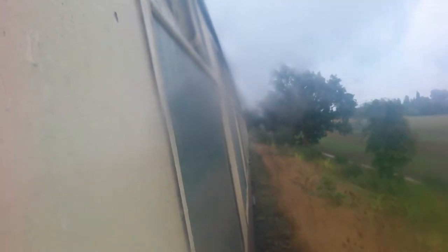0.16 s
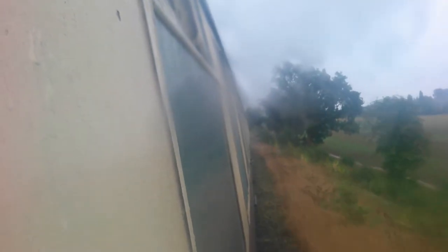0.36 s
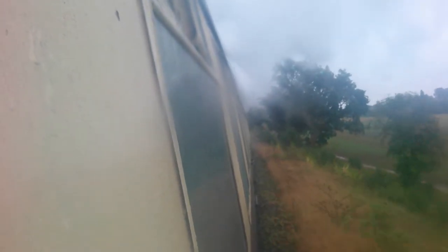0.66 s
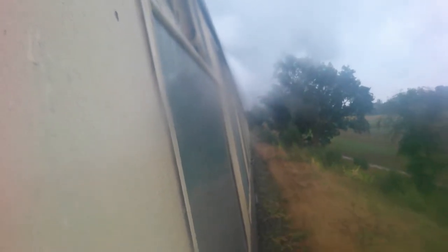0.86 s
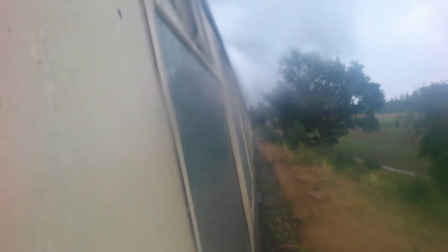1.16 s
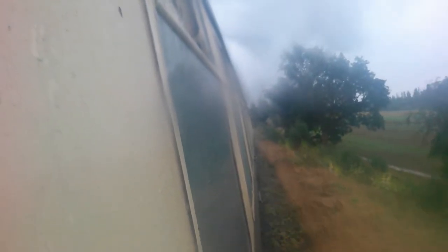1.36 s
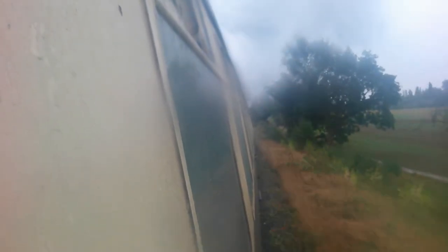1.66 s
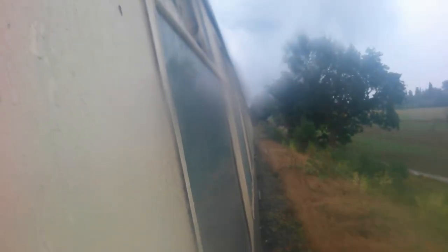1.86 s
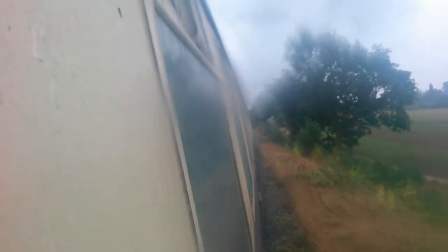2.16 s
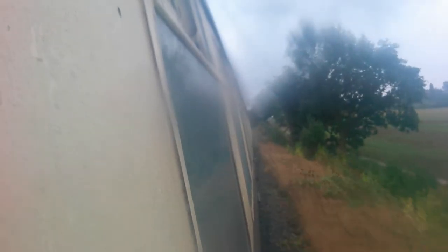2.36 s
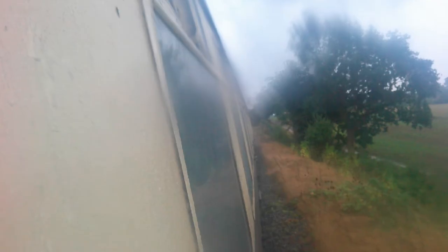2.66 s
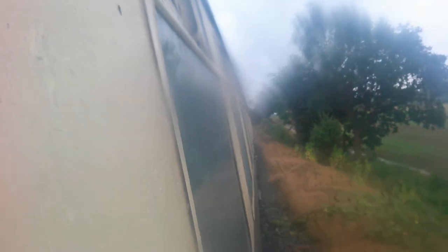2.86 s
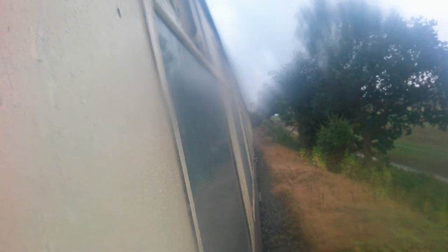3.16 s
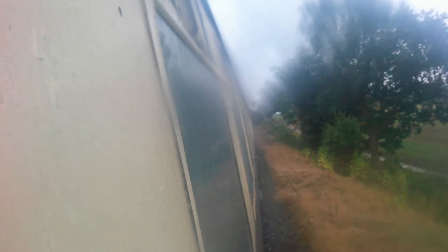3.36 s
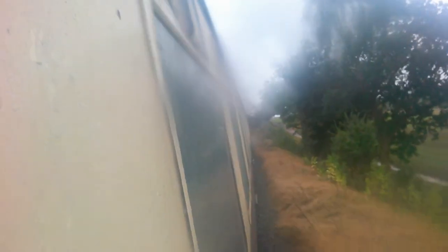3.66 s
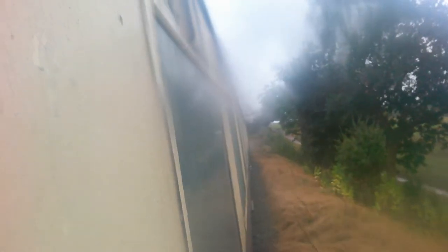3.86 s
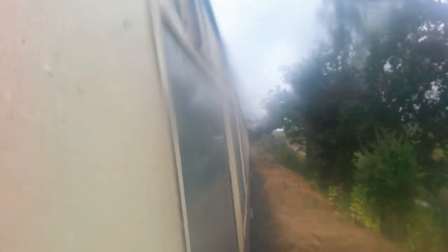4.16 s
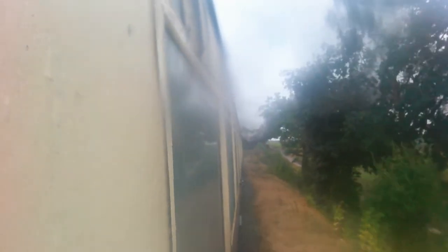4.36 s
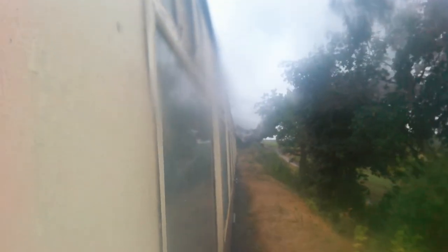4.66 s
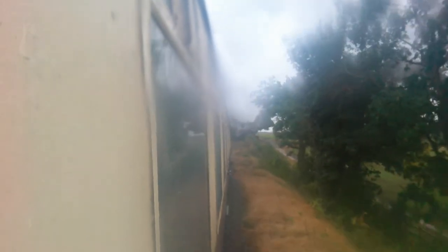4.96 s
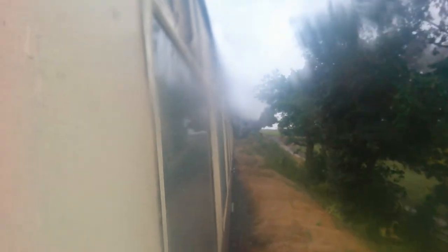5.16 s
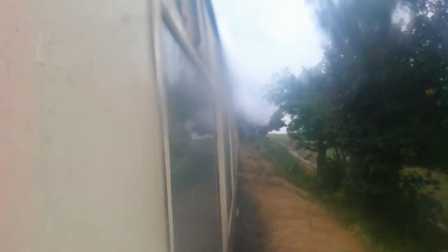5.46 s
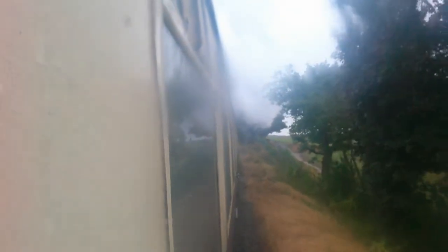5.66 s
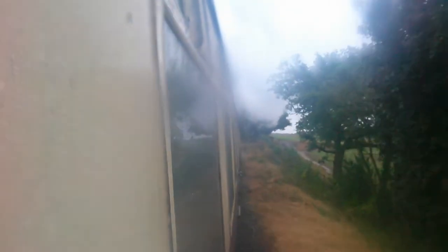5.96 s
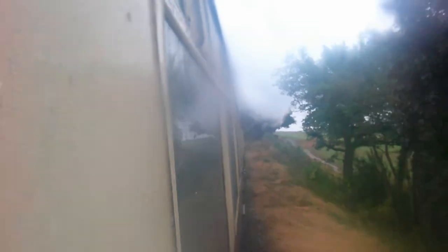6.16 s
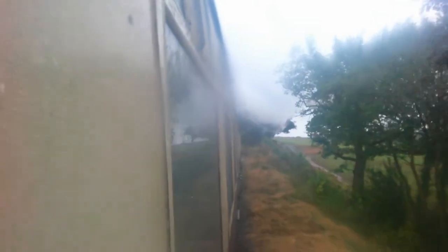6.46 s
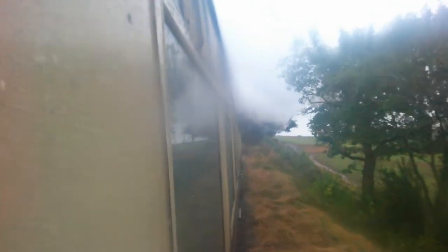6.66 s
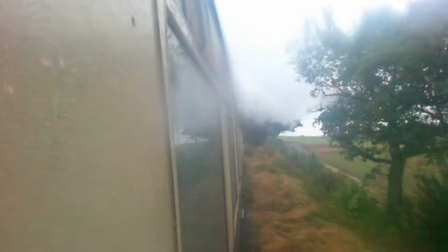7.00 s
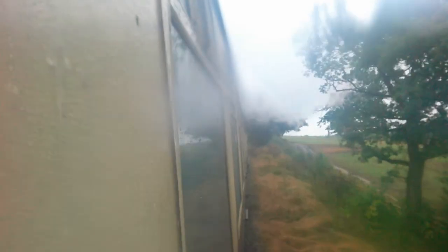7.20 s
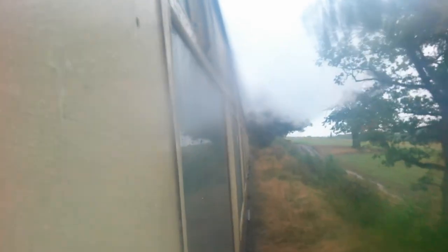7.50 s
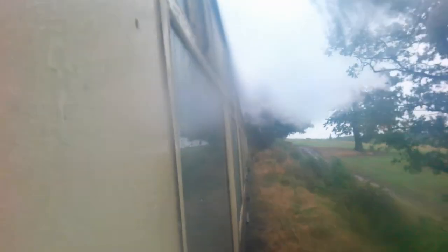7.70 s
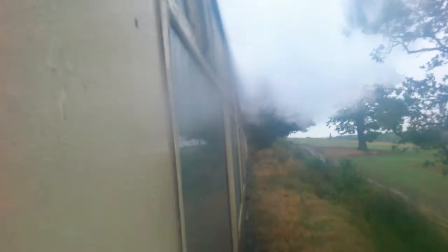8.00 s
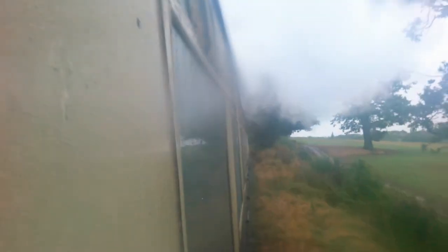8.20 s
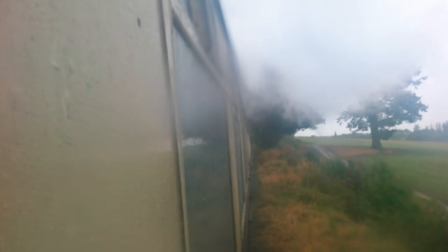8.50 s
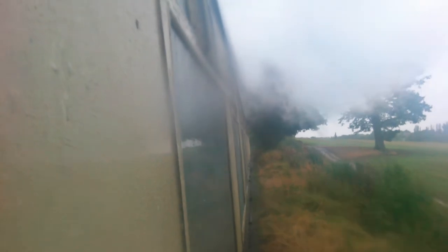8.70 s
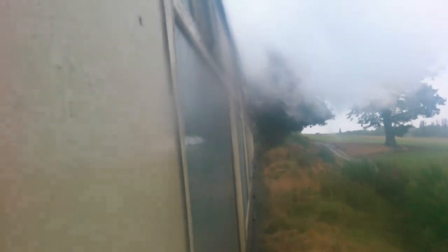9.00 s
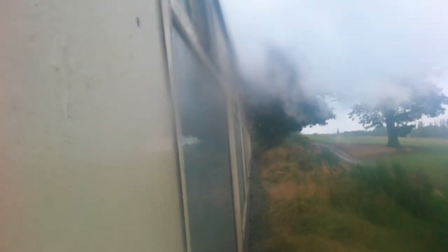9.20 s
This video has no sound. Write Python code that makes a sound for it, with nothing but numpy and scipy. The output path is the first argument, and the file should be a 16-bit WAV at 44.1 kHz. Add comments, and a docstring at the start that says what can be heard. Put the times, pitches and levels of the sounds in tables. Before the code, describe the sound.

Close, mono sound from an open window of a running steam train, the small microphone overloading almost constantly. Deep wind buffeting, low wheel roar and a faint steady hiss run throughout, with gritty crackle from clipped peaks supplying most of the treble. At 0.1 s a quick group of four dull axle thumps crosses a rail joint; more groups follow near 1.8, 3.5, 5.2, 6.9 and 8.6 s, strong early and softer later. Muffled exhaust puffs, weak at first, beat about nine times a second, unevenly, with occasional brief swells. A breathy low howl of wind off an edge rises by 0.4 s, sinks slightly in pitch and peaks around 1.7 s, nearly vanishes near 3 s, and returns after 5.7 s. Gusts are strong around 7 and 8 s. From 8.9 s howl and roar surge to their loudest, ending abruptly at 9.3 s without slowing.

```python
"""A running steam train, heard from an open carriage window by a small microphone that overloads.
Wind buffeting, wheel roar and a faint steady hiss run throughout, all as coloured noise; four axles thump
a rail joint at once, then about every 1.7 s. Exhaust puffs, weak at first, beat about nine times a second.
A band of noise howls off an edge, thins out near 3 s and is strongest at the end, where the roar swells too.
The flattened peaks of the overload make nearly all of the treble."""
import sys
import numpy as np
from scipy import signal
from scipy.fft import rfft, irfft
from scipy.io import wavfile
from scipy.ndimage import uniform_filter1d

SR = 44100
rng = np.random.default_rng(int(sys.argv[2]) if len(sys.argv) > 2 else 0)


def output_pcm(signal):
    """Save a mono or channel-first signal as 16-bit PCM at the path in sys.argv[1].

    Samples are clipped to [-1, 1] before scaling.
    """
    pcm = np.clip(np.atleast_2d(signal).T, -1, 1) * 32767
    wavfile.write(sys.argv[1], SR, np.round(pcm).astype(np.int16))


N = 411894   # samples, 9.34 s


def from_db(db):
    """Decibels to gain."""
    return 10 ** (np.asarray(db) / 20)


def rms_one(x):
    """Scaled to rms 1."""
    return x / np.sqrt(np.mean(x ** 2) + 1e-20)


def coloured(x, spectrum):
    """Filtered by a (Hz, dB) curve: level below its first point, silent above its last."""
    hz = np.arange(1, N // 2 + 2) * SR / N
    point_hz, point_db = np.transpose(spectrum)
    gain_db = np.interp(np.log(hz), np.log(point_hz), point_db, right=-150)
    return irfft(rfft(x) * from_db(gain_db), N)


def noise(spectrum):
    """Steady noise of a given colour, rms 1."""
    return rms_one(coloured(rng.standard_normal(N), spectrum))


def drift(rate_hz):
    """Slow chance: noise through a double one-pole low-pass, rms 1."""
    r = np.exp(-2 * np.pi * rate_hz / SR)
    slow = signal.lfilter([1], [1, -2 * r, r * r], rng.standard_normal(N + SR))
    return rms_one(slow[SR:])   # the first second lets the filter settle


def curve(rows):
    """Columns of a table, joined by straight lines in time."""
    s, *columns = np.transpose(rows)
    return [np.interp(np.arange(N) / SR, s, c) for c in columns]


def bursts(events, rise_share):
    """An envelope with one hump per event: a share of its length rises to the peak, the rest dies away."""
    t, out = np.arange(N) / SR, np.zeros(N)
    for s, level_db, length_s in events:
        near = slice(max(round((s - .1) * SR), 0), round((s + .2) * SR))
        late = (t[near] - s) / max(length_s, .005)
        side = np.where(late < 0, rise_share, 1 - rise_share)
        out[near] += from_db(level_db) * np.exp(-(late / side) ** 2)
    return out


def evened(x, share, window_s):
    """Noise that holds its level: part of its random swell is divided out."""
    swell = uniform_filter1d(x ** 2, size=max(round(window_s * SR), 1)) + 1e-6
    return rms_one(x * swell ** (-share / 2))


# Colour of the hiss. Each row: frequency in Hz, level in dB per Hz.
HISS_COLOUR = [(600, -9.5), (1000, -3), (2000, -7.5), (3000, -20), (4200, -33)]


def faint_hiss():
    """A quiet bed of higher noise at a constant level."""
    level_db = -44
    return from_db(level_db) * noise(HISS_COLOUR)


# Colour of the buffeting. Each row: frequency in Hz, level in dB per Hz.
BUFFET_COLOUR = [(8, 2.5), (20, 5), (50, 5.5), (100, -2.5), (160, -4), (250, -9.5), (400, -56), (700, -66)]
# Gusts on the microphone. Each row: time in seconds, level in dB.
GUSTS = [(0, -8), (.6, -8.5), (1.0, -6), (1.35, -12.5), (1.9, -7.5), (2.7, -13), (3.3, -7), (4.1, -5),
         (5.0, -15), (5.4, -6.5), (6.1, -10), (6.85, -3), (7.5, -7), (8.1, -3.5), (8.8, -5), (9.34, -7.5)]


def wind_buffeting():
    """Turbulent air pushes on the microphone: deep noise that follows the gusts and flutters at random."""
    gust_db, = curve(GUSTS)
    flutter_db = 1.27 * drift(9.4) + 1.5 * drift(3.0)
    return from_db(gust_db + flutter_db) * noise(BUFFET_COLOUR)


HOWL_WIDTH_HZ, HOWL_WANDER_HZ = 66.3, 9   # full width of the band; rms wander of its centre


def howl_band(centre_hz):
    """Air shed from an edge: slow noise turned up to a moving centre makes a steep-sided band."""
    sos = signal.butter(2, HOWL_WIDTH_HZ / 2, fs=SR, output="sos")
    slow = signal.sosfilt(sos, rng.standard_normal((2, N + SR)))[:, SR:]
    phase = 2 * np.pi * np.cumsum(centre_hz + HOWL_WANDER_HZ * drift(3.0)) / SR
    return rms_one(slow[0] * np.cos(phase) + slow[1] * np.sin(phase))


# Course of the edge howl. Each row: time in seconds, level in dB, centre in Hz.
HOWL_COURSE = [(0, -13.5, 286.7), (.25, -21, 287), (.33, -3.5, 288), (.8, -5, 282), (1.05, -2.5, 265),
               (1.65, 0, 250), (2.2, -6.5, 252), (2.6, -15.5, 258), (3.05, -22.5, 268.9), (3.8, -12, 271),
               (4.5, -10, 274), (5.3, -12.5, 268), (5.75, -4.5, 258), (6.4, -4.5, 250), (6.6, -7.5, 258),
               (7.15, -7, 268), (7.3, -0.5, 276.1), (8.15, 2, 290), (8.55, -4, 275), (8.9, 5.5, 288),
               (9.34, 5.5, 286)]


def edge_howl():
    """Wind sheds from an edge as a band of noise that glides in pitch, its level partly evened."""
    level_db, centre_hz = curve(HOWL_COURSE)
    band = evened(howl_band(centre_hz), share=0.21, window_s=0.046)
    return from_db(level_db + 1.5 * drift(4.0)) * band


# Colour of the rolling wheels. Each row: frequency in Hz, level in dB per Hz.
ROAR_COLOUR = [(100, -17.5), (200, -4), (300, -2.5), (420, 0), (520, -4), (600, -9), (700, -25), (900, -40),
               (1300, -60)]
# Strength of the rolling. Each row: time in seconds, level in dB.
ROLLING = [(0, -10), (.3, -11.5), (.65, -5), (1.1, -8), (1.9, -6), (2.4, -7), (2.65, -13), (3.1, -9),
           (3.5, -10), (4.2, -6), (5.0, -8.5), (6.1, -5.5), (6.8, -7.5), (7.25, -2.5), (8.7, -1), (9.1, 5),
           (9.34, 4)]


def wheel_roar():
    """Wheels rolling on rail: a band of low noise that rises and falls with a small random flutter."""
    level_db, = curve(ROLLING)
    return from_db(level_db + 0.73 * drift(6.0)) * noise(ROAR_COLOUR)


RAIL_M = 18.3   # from one rail joint to the next
# Rail joints. Each row: first axle in seconds, then the thump of each of the four axles in dB.
JOINTS = [(.082, 7.5, 5, -7, -3.5), (1.826, 9, 7.5, 5.5, 1.5), (3.546, 8, 7.5, 2.5, -1.5),
          (5.236, 2.5, 3.5, 5, -5.5), (6.906, 3.5, 2.5, -2.5, -4.5), (8.6, -5, -1.5, 3, -9)]


def time_at(metres):
    """When the train has run so far past the first joint; beyond the last it keeps its speed."""
    s = [row[0] for row in JOINTS]
    next_joint_s = 2 * s[-1] - s[-2]
    return np.interp(metres, RAIL_M * np.arange(len(s) + 1), s + [next_joint_s])


# Axles of two bogies. Each entry: distance behind the first axle in metres.
AXLES_M = [0, 2.63, 6.12, 8.82]


def axle_strikes():
    """Four axles strike every joint in turn, timed by their spacing and the train's speed."""
    length_s = .024
    strikes = []
    for k, (_, *levels_db) in enumerate(JOINTS):
        for behind_m, level_db in zip(AXLES_M, levels_db):
            strikes.append((time_at(RAIL_M * k + behind_m), level_db, length_s))
    return strikes


# Colour of a thump. Each row: frequency in Hz, level in dB per Hz.
THUMP_COLOUR = [(100, -22), (200, -2.5), (300, 2.5), (450, 2), (550, -2.5), (650, -13.5), (800, -18.5),
                (1100, -39), (1500, -66.5)]


def joint_thumps():
    """Each axle strike is a short hump of low, strongly evened noise."""
    body = evened(noise(THUMP_COLOUR), share=0.79, window_s=.01)
    return bursts(axle_strikes(), rise_share=0.41) * body


BEAT_M, FIRST_BEAT_M = 1.204, .81   # four beats per turn of the driving wheels; the first past a joint
BEAT_S, BEAT_SPREAD_DB, BEAT_JITTER_S = .04, 1.5, .005   # length of a beat; rms unevenness of level and time
# Strength of the exhaust beats. Each row: time in seconds, level in dB.
EXHAUST_STRENGTH = [(0, -14), (.5, -8), (1.0, -6.5), (1.9, -4), (2.3, -12.5), (2.85, -4), (3.1, -9.5),
                    (4.0, -6), (4.6, -5.5), (4.9, -10), (5.15, -4), (5.4, -9.5), (5.6, -7), (6.3, -10.5),
                    (7.2, -5.5), (9.34, -7.5)]


def exhaust_beats():
    """One beat for every quarter turn of the driving wheels, each a little uneven."""
    k = np.arange(84)   # enough to reach the end
    chance = rng.standard_normal((len(k), 2))
    s = time_at(FIRST_BEAT_M + BEAT_M * k) + BEAT_JITTER_S * chance[:, 0]
    level_db = np.interp(s, *np.transpose(EXHAUST_STRENGTH)) + BEAT_SPREAD_DB * chance[:, 1]
    return [(a, b, BEAT_S) for a, b in zip(s, level_db) if a < N / SR]


# Colour of the exhaust. Each row: frequency in Hz, level in dB per Hz.
PUFF_COLOUR = [(150, -19), (300, -8), (430, 5), (520, 2), (620, -8), (750, -29.5), (1000, -42.5),
               (1400, -58.5)]
# Brief swells of the rush, at irregular times, some close to a beat.
# Each row: peak in seconds, level in dB, length in seconds.
SWELLS = [(.188, 0, 0.029), (.545, -4, .03), (0.704, -2.5, .05), (1.13, -3, .055), (1.377, -1.5, .04),
          (5.041, -5.5, .037), (5.878, -4, 0.037), (6.435, -1.5, 0.037), (6.975, -3, .027),
          (8.263, 1.5, .038), (9.002, 0.5, .04)]


def exhaust():
    """Puffs of steam: partly evened low noise opened by every beat and by the extra swells."""
    rush = evened(noise(PUFF_COLOUR), share=0.38, window_s=0.017)
    return bursts(exhaust_beats() + SWELLS, rise_share=0.5) * rush


def scene():
    """Hiss, wind, howl, wheels and exhaust add at the window."""
    air = faint_hiss() + wind_buffeting() + edge_howl()
    train = wheel_roar() + joint_thumps() + exhaust()
    return (air + train)[None]


TOP, OFFSET = .708, -.005   # clipping level and the shift added after it, full scale = 1
SELF_NOISE_DB = -71   # faint white noise, before the tone curve
CUTOFF_HZ = 15950   # nothing much passes above
# Tone of the recorder. Each row: frequency in Hz, gain in dB.
RECORDER_TONE = [(20, 0), (4000, -.5), (7400, -.5), (9200, -10), (12500, -11.5), (15000, -4), (17000, -4)]


def record(dry):
    """The input clips hard and gains a small offset; the treble is lowered above 8 kHz and the top is cut."""
    clipped = np.clip(dry[0], -TOP, TOP) + OFFSET
    noisy = clipped + from_db(SELF_NOISE_DB) * rng.standard_normal(N)
    top_cut = signal.cheby2(24, 60, CUTOFF_HZ, fs=SR, output="sos")
    return signal.sosfilt(top_cut, coloured(noisy, RECORDER_TONE))[None]


dry = scene()
out = record(dry)
output_pcm(out)
```